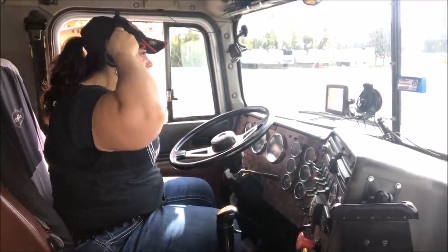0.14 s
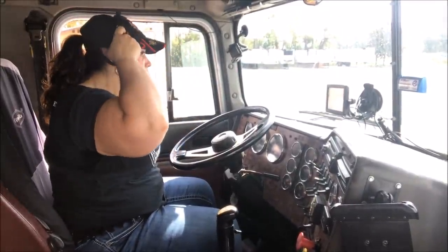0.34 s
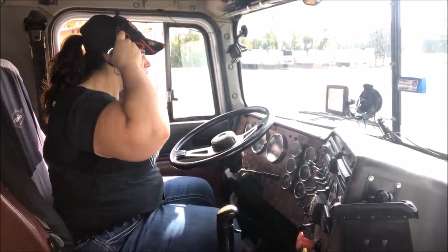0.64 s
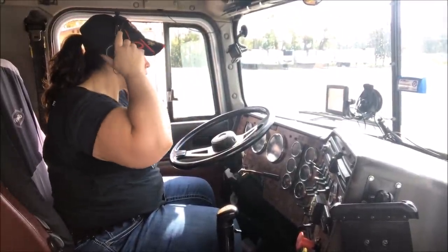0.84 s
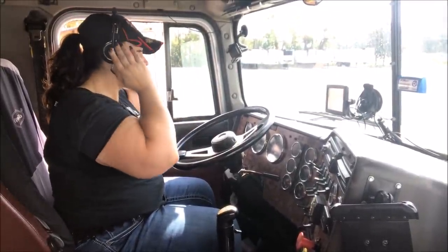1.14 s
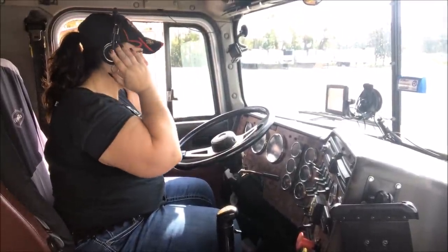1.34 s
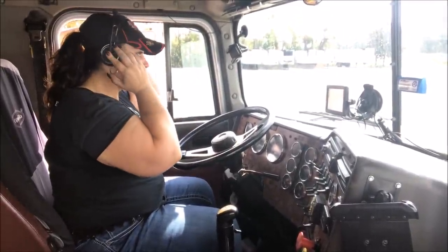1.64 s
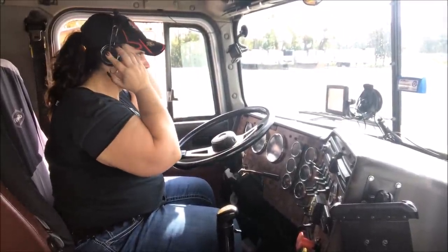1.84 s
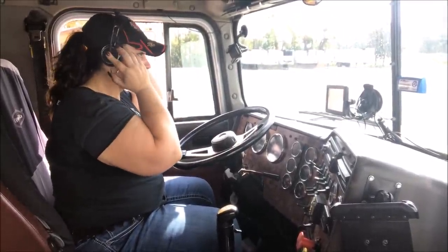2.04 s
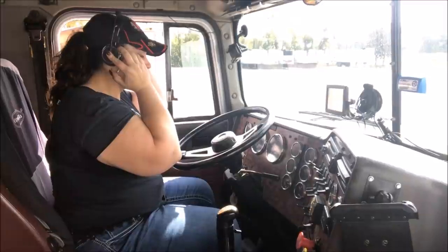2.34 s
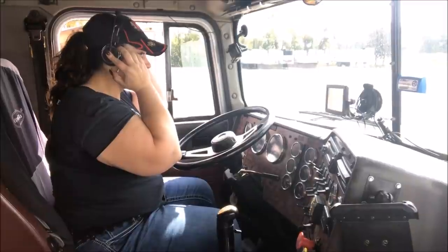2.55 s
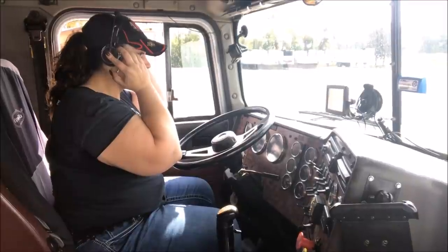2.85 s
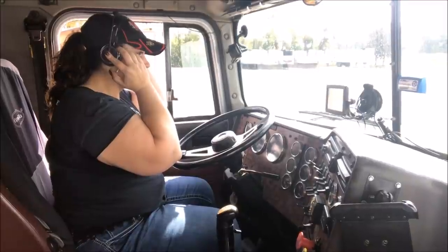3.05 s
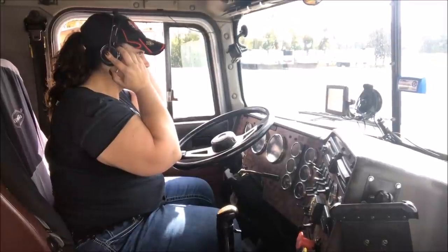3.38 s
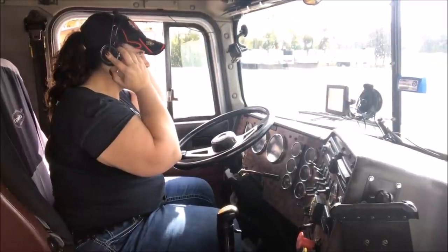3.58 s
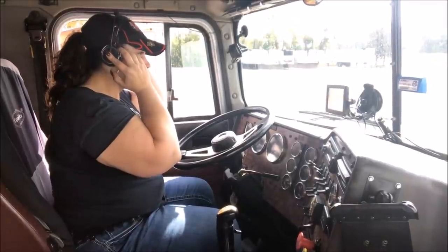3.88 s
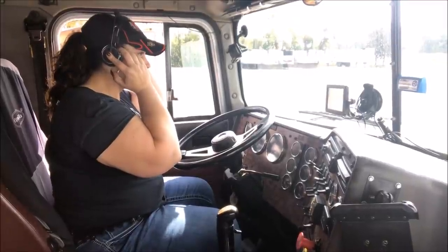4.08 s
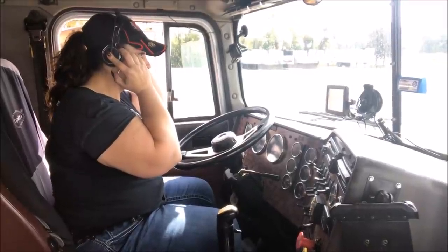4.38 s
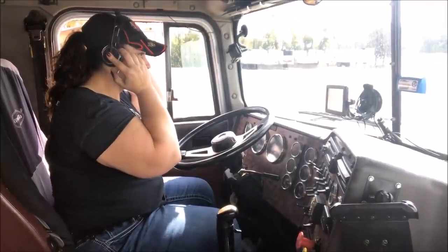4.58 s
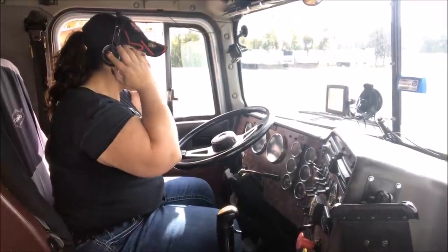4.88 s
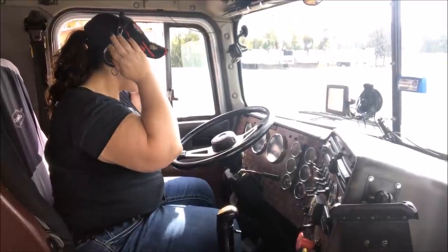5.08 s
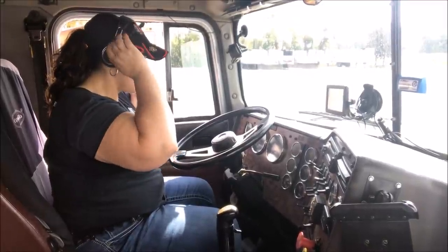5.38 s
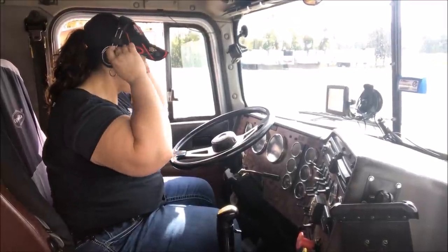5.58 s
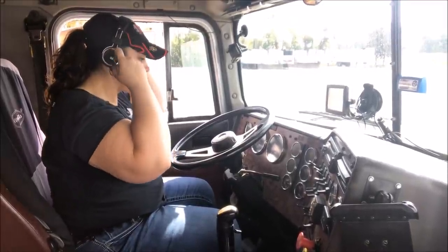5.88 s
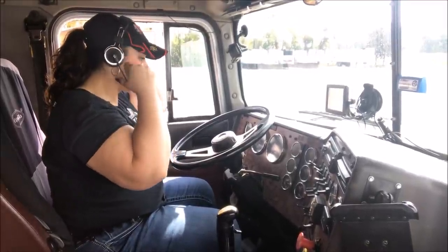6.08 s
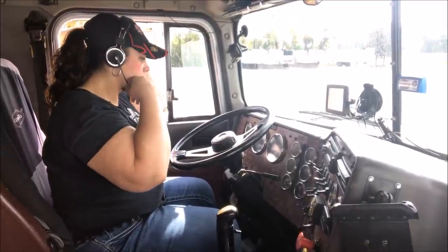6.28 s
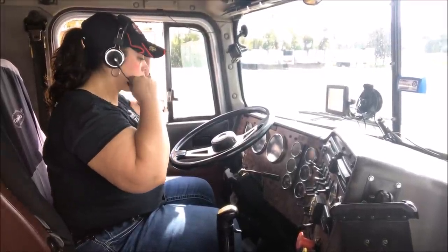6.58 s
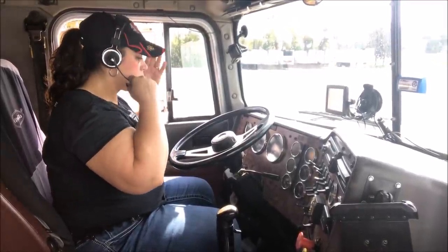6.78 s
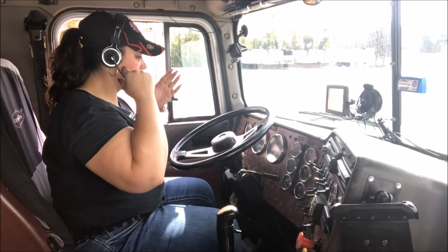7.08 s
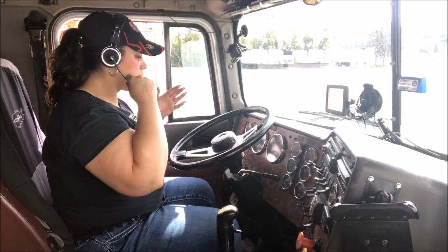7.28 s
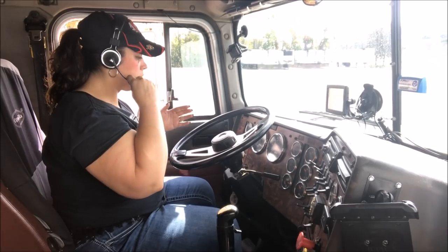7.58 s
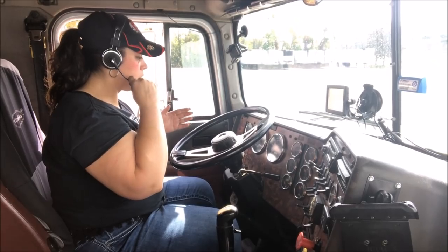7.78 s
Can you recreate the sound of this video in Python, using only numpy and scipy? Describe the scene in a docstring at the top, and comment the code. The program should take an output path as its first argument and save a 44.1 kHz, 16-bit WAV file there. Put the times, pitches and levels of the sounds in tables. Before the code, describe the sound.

A large diesel engine idles steadily, heard from inside a parked truck's cab as a low rumble with clatter and lightly rattling fittings. About every second and a half a faint whine swells and ends in a short spit of air. A dull thump comes early. Late on, the sound cuts out for half a second, returns slightly louder with a click, and a second thump follows.

```python
"""Diesel idle in a truck cab

A six-cylinder diesel idles at 700 rpm; its firings boom and clatter through the parked truck's panels.
About every 1.5 s a load lets go: the engine picks up a touch, an accessory whine swells, and a valve
spits air as the load returns. Fittings rattle lightly and two dull thumps poke through.
Late on, the sound cuts out for half a second and comes back louder with a click."""
import sys
import numpy as np
from scipy import signal
from scipy.fft import rfft, irfft, next_fast_len
from scipy.io import wavfile

SR = 44100
rng = np.random.default_rng(int(sys.argv[2]) if len(sys.argv) > 2 else 0)


def wav_record(signal):
    """Record a signal, one row per channel, as 16-bit PCM in the file named by sys.argv[1]."""
    frames = np.transpose(np.atleast_2d(signal))
    bounded = np.clip(frames, -1, 1)
    # unit amplitude maps onto the largest positive 16-bit level
    quanta = np.round(bounded * 32767).astype(np.int16)
    wavfile.write(sys.argv[1], SR, quanta)


N = 349713

FIRING_HZ, SPEED_RISE = 34.94, 0.005  # firing rate under load; fraction it gains with the load off
WHINE_HZ, WHINE_RISE = 1945.5, 0.009  # whine pitch under load; fraction it gains with the load off

# exhaust and block tones: firing_multiple, level_db
ENGINE_ORDERS = [(1, -42.5), (1.5, -47), (2, -39), (2.5, -44.5), (3, -47), (4.5, -50.5), (5, -44.5)]
# the cab's broad, dark EQ: frequency_hz, gain_db
CAB_EQ = [(22, -26), (31, -13.5), (43, -10), (62, -5.5), (88, 2), (150, -3), (280, -8), (450, -15),
          (700, -18.5), (1600, -24), (3000, -30), (4900, -36.5), (6400, -37), (10400, -53.5),
          (15500, -56.5)]
# panel and air resonances, and the notches between them: centre_hz, width_hz, gain_db
CAB_RESONANCES = [(98.5, 10, 1.5), (129.5, 9, 4), (186, 12, 3), (225, 44, 2), (318.3, 32.6, 5.5),
                  (376.4, 32, 5), (440, 30, 2), (530, 69, 5), (578, 22, -3), (620, 20, -2), (670, 26, -1),
                  (1097, 354, 5.5), (1252, 37, -4), (1315, 92, 5), (1424, 27, 2.5), (1436, 20, -1),
                  (1477, 34, 3.5), (1807, 40, 3.5), (1895, 28, 3.5), (1960, 99, 7), (2138, 60, 4.5),
                  (2330, 170, 2.5), (2485, 80, 3.5), (2752, 76, 5.5), (2982, 45, 1), (2996, 40, 4.5),
                  (3143, 44, 0), (3386, 50, 0.5), (3450, 69, 7.5), (3680, 170, 4), (3830, 82, 4),
                  (4126, 120, 4), (4960, 120, -5.5), (5340, 110, 3), (5560, 150, 2.5), (6130, 130, 2),
                  (6370, 150, 1.5), (7930, 130, 0), (9200, 1200, 2)]
# faint gear tones under load: pitch_hz, level_db
GEAR_TONES = [(500, -55.5), (597, -57.5), (638, -52.5), (1100, -55), (1290, -56.5), (2242, -57.5)]
# each spell with the load off, and the air spit that ends it:
# release_s, return_s, whine_db, spit_db, spit_attack_s, spit_decay_s, spit_tilt_db_per_octave
LOAD_RELEASES = [(0.14, 0.774, -46, -35.5, 0.00034, 0.012, -2), (1.733, 2.273, -43.5, -37, .0005, .013, 0),
                 (3.19, 3.786, -44, -37, .0006, 0.014, -1), (4.67, 5.294, -44, -34, .002, 0.018, -3),
                 (6.203, 6.729, -47, -38, .0005, .012, 0), (7.687, 8.242, -45, -36, .0005, .013, 0)]
# the bright EQ of the air spit: frequency_hz, gain_db
SPIT_EQ = [(1000, -5), (3000, 4), (6800, -5.5), (7500, 3), (8000, 0.5), (8600, -9.5), (10500, -12),
           (13000, -7), (16000, -8)]
# dull thumps in the cab: start_s, level_db, pitch_hz, decay_s
CAB_THUMPS = [(1.239, -12, 100, .014), (7.247, -15.5, 91, 0.023)]
# the lift in the mix after the silence: frequency_hz, gain_db
LIFT_EQ = [(35, 3.5), (65, 1), (105, 4.5), (175, 0.4), (290, 0.5), (400, -1.5), (750, 2.6), (1100, 1.5),
           (2500, 3), (6000, 3), (15000, 2.5)]


def amp(db):
    """Decibels to gain."""
    return 10 ** (np.asarray(db) / 20)


def unit(x):
    """Scales to rms 1."""
    return x / np.sqrt(np.mean(x ** 2) + 1e-20)


def eq_db(points, hz):
    """An EQ curve: straight lines between points on a log-frequency axis."""
    point_hz, gain_db = np.transpose(points)
    return np.interp(np.log(hz + 1), np.log(point_hz), gain_db)


def colour(x, db_at):
    """Zero-phase EQ; db_at gives the gain in dB at each frequency."""
    size = next_fast_len(N + SR // 4)
    return irfft(rfft(x, size) * amp(db_at(np.fft.rfftfreq(size, 1 / SR))), size)[:N]


def ring(x, db_at):
    """Minimum-phase EQ: resonances ring on after each hit."""
    size = next_fast_len(N + SR // 4)
    hz = abs(np.fft.fftfreq(size, 1 / SR))
    log_gain = np.log(amp(np.maximum(db_at(hz), -120)))
    response = np.exp(np.conj(signal.hilbert(log_gain)))[:size // 2 + 1]
    return irfft(rfft(x, size) * response, size)[:N]


def wander(rate_hz):
    """A smooth random modulator of rms 1, rolled off above rate_hz."""
    return unit(colour(rng.standard_normal(N), lambda hz: -20 * np.log10(1 + (hz / rate_hz) ** 2)))


def cab_db(hz):
    """The path from engine to cab: a dark EQ with bell-shaped panel resonances."""
    bells_db = sum(db * 0.5 ** ((2 * (hz - centre) / width) ** 2) for centre, width, db in CAB_RESONANCES)
    return eq_db(CAB_EQ, hz) + bells_db


def ripple_db(hz, depth_db=2.35, spacing_hz=28):
    """The cab's countless small modes: a random fine ripple in the EQ, deeper toward the treble."""
    knots = np.arange(0, SR / 2, spacing_hz)
    heights = np.clip(rng.standard_normal(len(knots)), -2, 2)
    return depth_db * np.interp(hz, knots, heights) * hz / (hz + 3000)


def hum(firings, level_waver=0.14, phase_waver=0.11):
    """Exhaust and block drone at multiples of the firing rate; higher tones waver more in phase."""
    out = np.zeros(N)
    for order, db in ENGINE_ORDERS:
        phase = 2 * np.pi * (order * firings + rng.random()) + phase_waver * order * wander(1.6)
        out += amp(db) * np.sqrt(2) * (1 + level_waver * wander(5.8)) * np.sin(phase)
    return out


def impacts(cycles, count, decay_gaps, uneven_db, chance_db):
    """Envelope of count unevenly spaced hits per engine cycle, with repeating accents plus chance."""
    places = (np.arange(count) + rng.random(count) / 2) / count
    hit_cycles = (np.arange(-1, 50)[:, None] + places).ravel()
    latest = np.searchsorted(hit_cycles, cycles) - 1
    accent = rng.uniform(-1, 1, count)
    chance = rng.uniform(-1, 1, len(hit_cycles))
    strength = amp(uneven_db * accent[latest % count] + chance_db * chance[latest])
    age_gaps = (cycles - hit_cycles[latest]) * count  # in mean gaps between hits
    return unit(strength * np.exp(-age_gaps / decay_gaps))


def chug(cycles, firing_db=-0.03, crank_db=0.18):
    """A faint tremolo from the six firings and two crank turns of each cycle."""
    phase = 2 * np.pi * cycles
    return amp(firing_db * np.cos(6 * phase) + crank_db * np.cos(2 * phase))


def boom(cycles, level_db=-30, lowpass_hz=650, punch=0.25, repeat_share=0.14):
    """Combustion rumble through the cab: six firings a cycle, with part of the pressure wave looping."""
    wave = rng.standard_normal(SR // 6)
    loop = unit(np.interp(cycles % 1, np.linspace(0, 1, len(wave)), wave))
    pressure = np.sqrt(repeat_share) * loop + np.sqrt(1 - repeat_share) * rng.standard_normal(N)
    hits = impacts(cycles, count=6, decay_gaps=0.45, uneven_db=3.5, chance_db=1.5)
    drive = chug(cycles) * np.sqrt(0.5 + punch * hits ** 2)
    in_cab = ring(drive * pressure, lambda hz: cab_db(hz) - 10 * np.log10(1 + (hz / lowpass_hz) ** 4))
    return amp(level_db) * unit(in_cab)


def clatter(cycles, level_db=-36, highpass_hz=650, punch=0.22, flutter_db=0.68, swell_db=0.6):
    """Injectors and valves strike eighteen times a cycle over a bed of mechanical hiss."""
    hits = impacts(cycles, count=18, decay_gaps=0.7, uneven_db=-1.5, chance_db=10.5)
    drive = chug(cycles) * np.sqrt(2 + punch * hits ** 2)
    drive *= amp(flutter_db * wander(150) + swell_db * wander(22))
    in_cab = ring(drive * rng.standard_normal(N),
                  lambda hz: cab_db(hz) + ripple_db(hz) - 10 * np.log10(1 + (highpass_hz / (hz + 1)) ** 4))
    return amp(level_db) * unit(in_cab)


def rattle(level_db=-48, hits_per_s=70, spread_db=3.5, ring_s=0.0079):
    """Loose fittings tap at random; each tap rings its own mix of the narrow panel resonances."""
    t = np.arange(SR // 12) / SR
    taps = (rng.random(N) < hits_per_s / SR) * amp(spread_db * rng.uniform(-0.59, 1, N))
    modes_hz = [hz for hz, width, db in CAB_RESONANCES if 1200 < hz < 4000 and width < 120 and db > 0]
    out = np.zeros(N)
    for hz in modes_hz:
        mode = amp(eq_db(CAB_EQ, hz)) * np.exp(-t / ring_s) * np.sin(2 * np.pi * hz * t)
        out += signal.oaconvolve(taps * rng.standard_normal(N), mode)[:N]
    return amp(level_db) * unit(out)


def gear_tone(hz, drift_hz=0.7, flutter_db=1.2):
    """A gear sings one sine tone, slightly shaky in pitch and level."""
    phase = 2 * np.pi * np.cumsum(hz + drift_hz * wander(10)) / SR
    return unit(amp(flutter_db * wander(21)) * np.sin(phase))


def whine(releases, firings, loaded_db=-51, jolt=0.005, throb_db=0.5, flutter_db=0.7):
    """An accessory whines, jolted by each firing; off load it swells and bends up with the gear tones."""
    speed = 1 + WHINE_RISE * releases.sum(0)
    firing_phase = 2 * np.pi * firings
    swell_db = sum((whine_db - loaded_db) * load_off ** 2.2
                   for (_, _, whine_db, *_), load_off in zip(LOAD_RELEASES, releases))
    level_db = loaded_db + swell_db + throb_db * np.sin(firing_phase) + flutter_db * wander(12)
    accessory = amp(level_db) * gear_tone(WHINE_HZ * speed * (1 - jolt * np.cos(firing_phase)))
    gears = sum(amp(db) * gear_tone(hz * speed) for hz, db in GEAR_TONES)
    return accessory + gears


def release_envelopes(t, rise_s=0.2, hold_s=0.03, fall_s=0.099):
    """One envelope per release: 0 under load, ramping to 1 as it lets go, sagging after it returns."""
    envelopes = []
    for release_s, return_s, *_ in LOAD_RELEASES:
        rise = np.clip((t - release_s) / rise_s + 0.5, 0, 1)
        fall = np.clip(1 - (t - return_s - hold_s) / fall_s, 0, 1)
        envelopes.append(rise * fall)
    return np.array(envelopes)


def valve_spits(t, sputter_db=0.5):
    """A valve lets out a short, sputtering spit of air each time the load returns."""
    out = np.zeros(N)
    for _, return_s, _, db, attack_s, decay_s, tilt in LOAD_RELEASES:
        age = np.maximum(t - return_s, 0)
        envelope = (1 - np.exp(-age / attack_s)) * np.exp(-age / decay_s)
        air = colour(rng.standard_normal(N),
                     lambda hz: eq_db(SPIT_EQ, hz) + tilt * np.log2((hz + 100) / 6000))
        out += amp(db) * envelope * unit(air)
    return out * amp(sputter_db * wander(300))


def thumps(t, attack_s=0.0046):
    """Two dull thumps poke out of the rumble: low, soft-edged sines that die fast."""
    out = np.zeros(N)
    for start_s, db, hz, decay_s in CAB_THUMPS:
        age = np.maximum(t - start_s, 0)
        envelope = (1 - np.exp(-age / attack_s)) ** 2 * np.exp(-age / decay_s)
        out += amp(db) * envelope * np.sin(2 * np.pi * hz * age)
    return out


def scene(rumble_swell_db=0.5):
    """The mono mix: with the load off, the engine runs a touch faster and its rumble swells."""
    t = np.arange(N) / SR
    releases = release_envelopes(t)
    load_off = releases.sum(0)
    firings = np.cumsum(FIRING_HZ * (1 + SPEED_RISE * load_off)) / SR  # running count
    cycles = firings / 6
    engine = hum(firings) + amp(rumble_swell_db * load_off) * boom(cycles) + clatter(cycles)
    return (engine + rattle() + whine(releases, firings) + valve_spits(t) + thumps(t))[None]


def record(dry, cut_s=6.295, resume_s=6.778, click_db=-13.5, click_s=0.0003, click_hz=2400, top_hz=15780):
    """The mix cuts out and comes back louder with a click; a steep low-pass trims the top end."""
    t = np.arange(N) / SR
    age = np.maximum(t - resume_s, 0)
    click = amp(click_db) * np.exp(-age / click_s) * np.cos(2 * np.pi * click_hz * age)
    louder = colour(dry[0], lambda hz: eq_db(LIFT_EQ, hz))
    mix = dry[0] * (t < cut_s) + (louder + click) * (t >= resume_s)
    lowpass = signal.firwin(511, top_hz, window=("kaiser", 9), fs=SR)
    return signal.oaconvolve(mix, lowpass, "same")[None]


dry = scene()
out = record(dry)
wav_record(out)
```